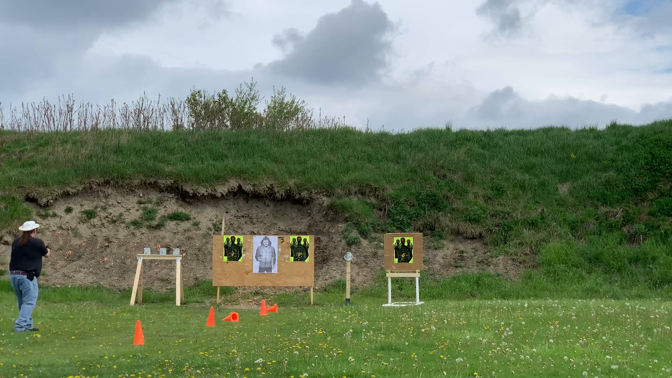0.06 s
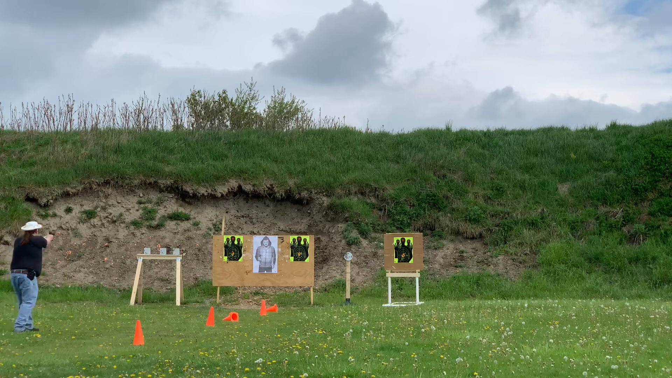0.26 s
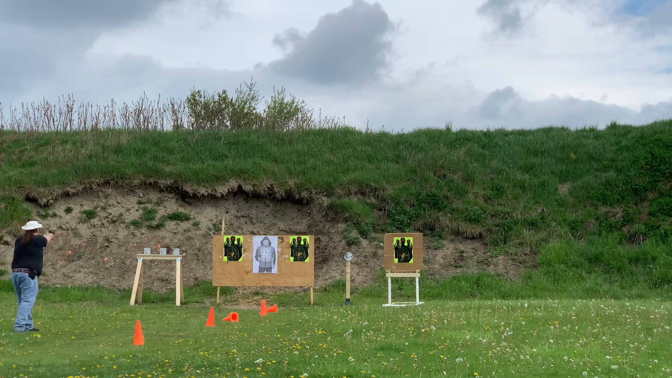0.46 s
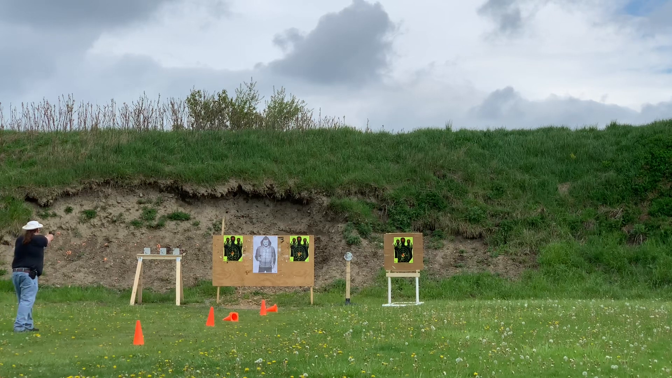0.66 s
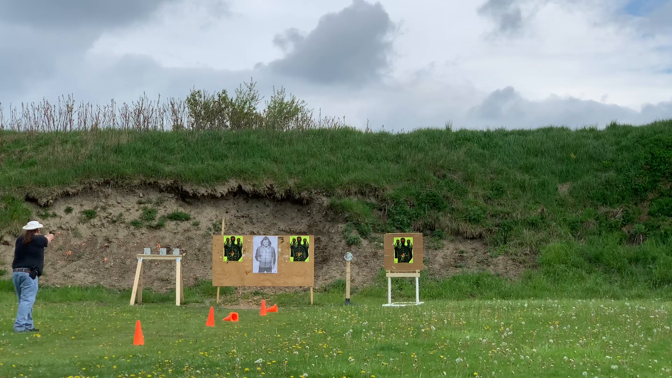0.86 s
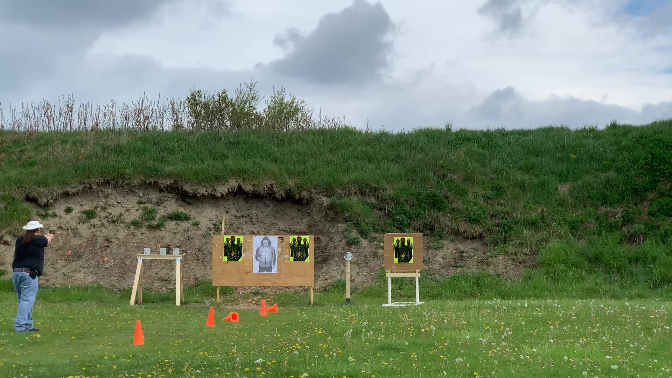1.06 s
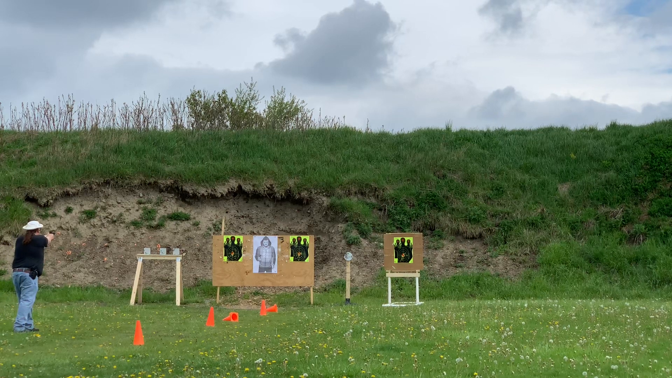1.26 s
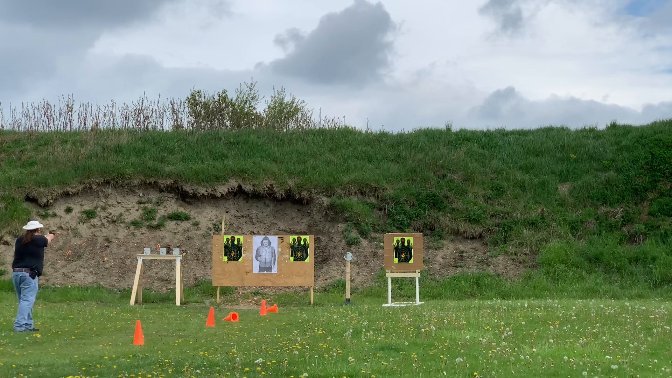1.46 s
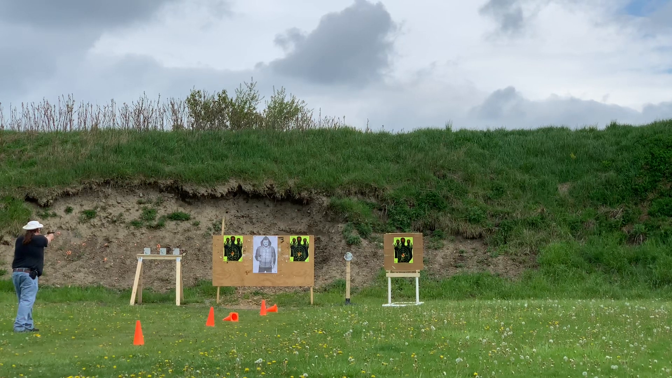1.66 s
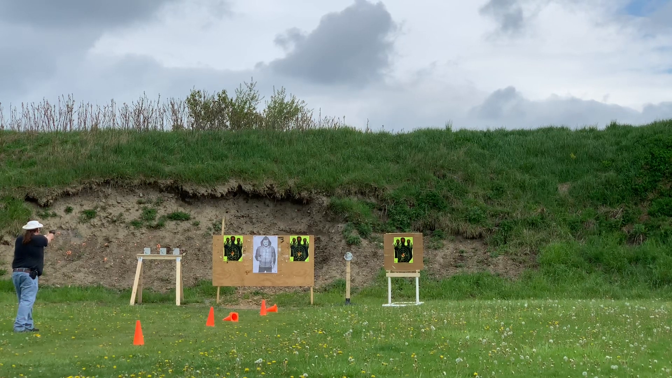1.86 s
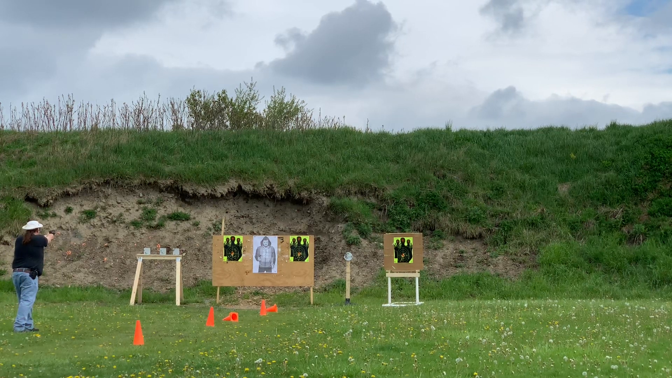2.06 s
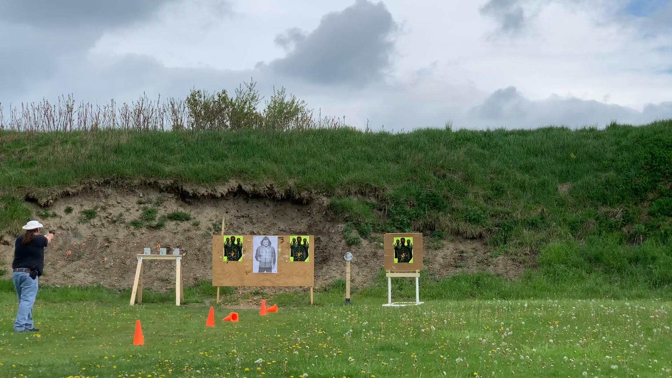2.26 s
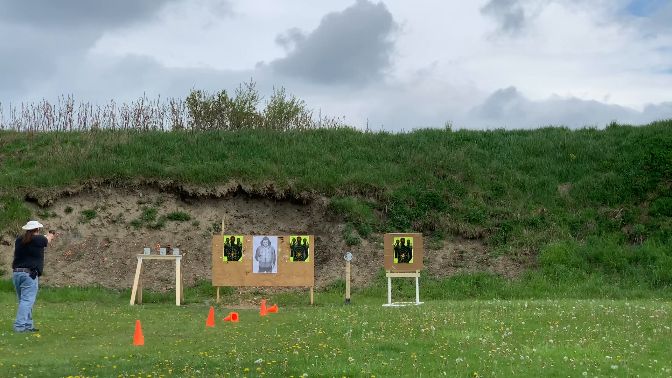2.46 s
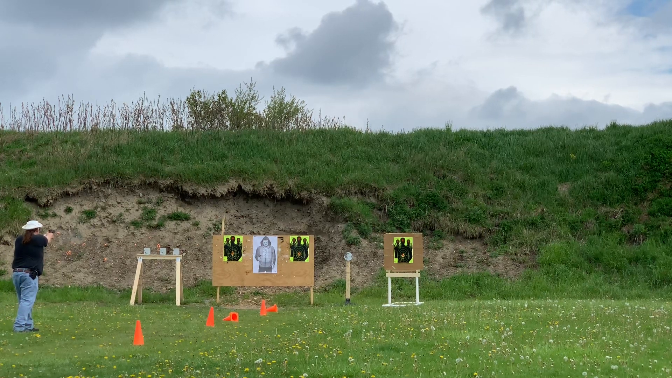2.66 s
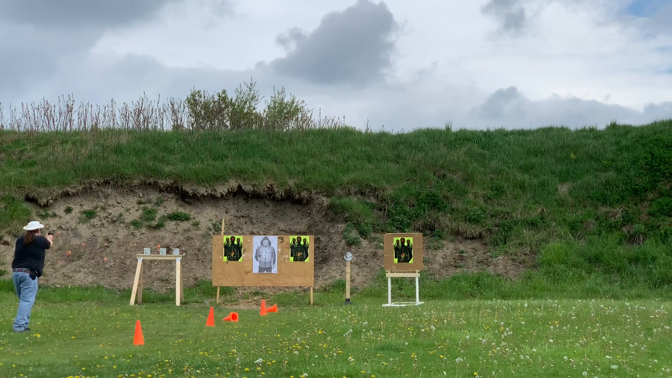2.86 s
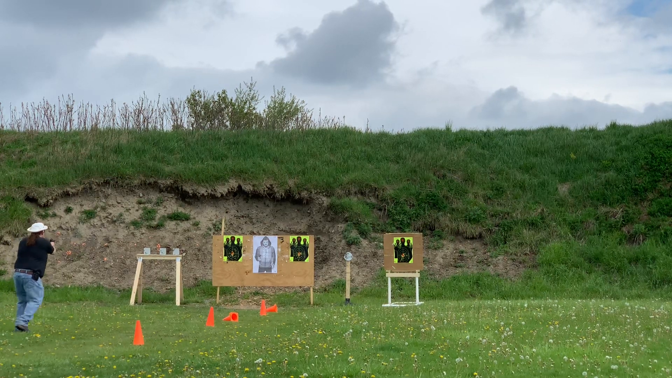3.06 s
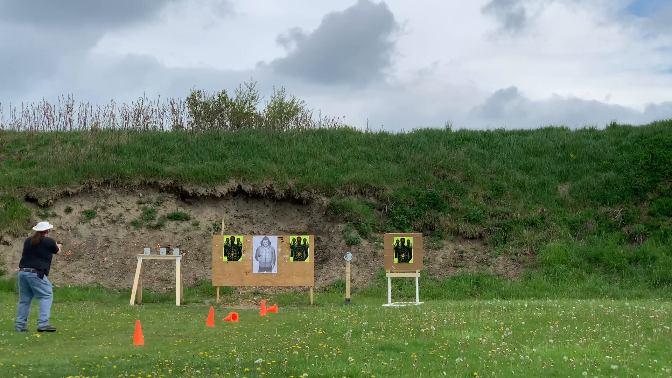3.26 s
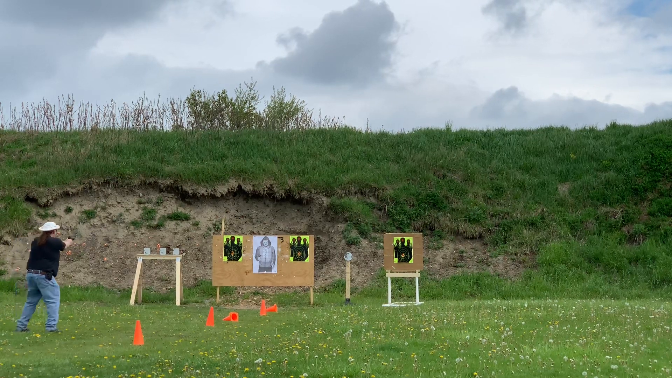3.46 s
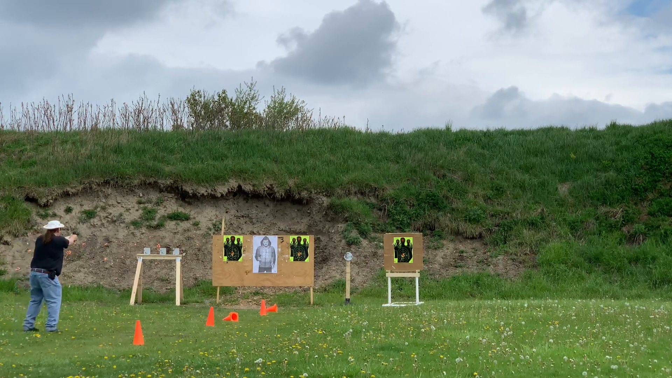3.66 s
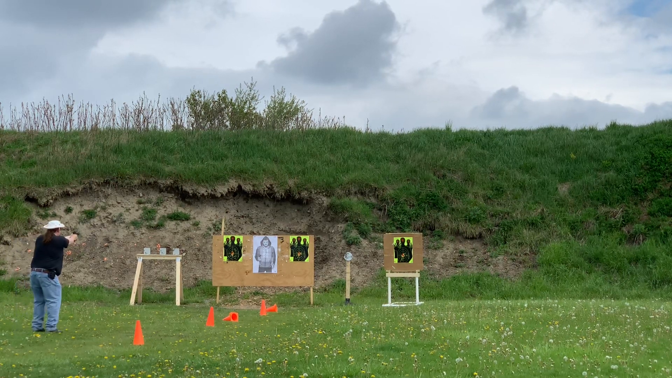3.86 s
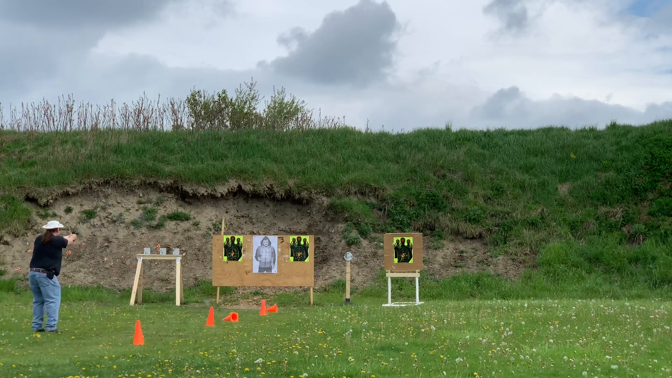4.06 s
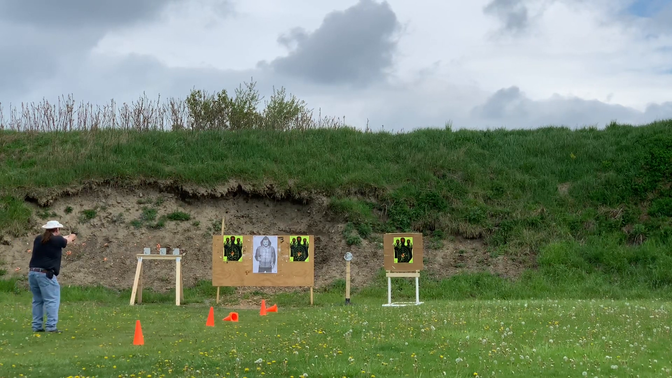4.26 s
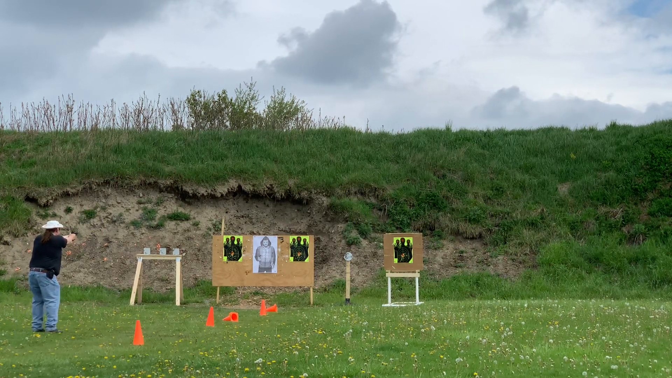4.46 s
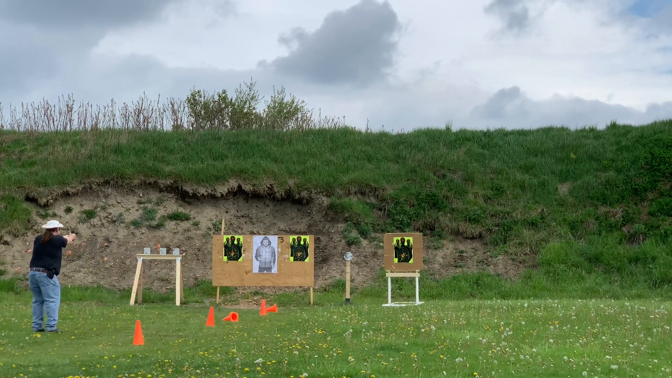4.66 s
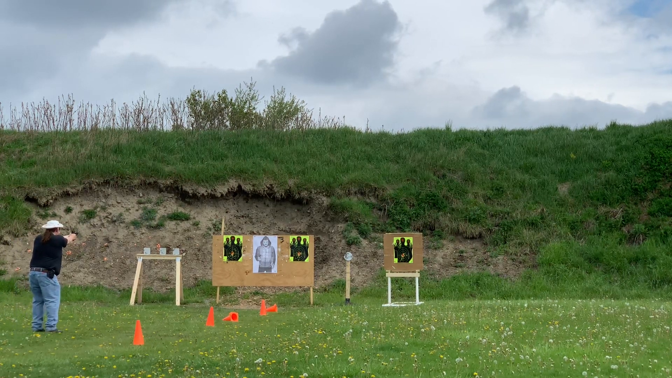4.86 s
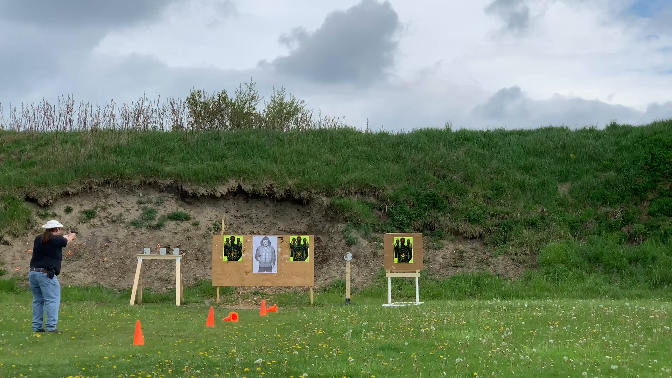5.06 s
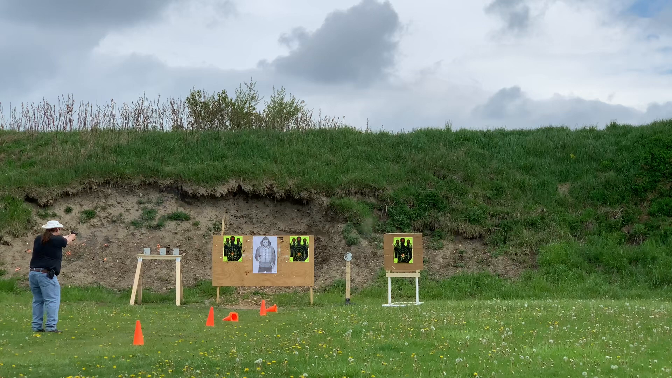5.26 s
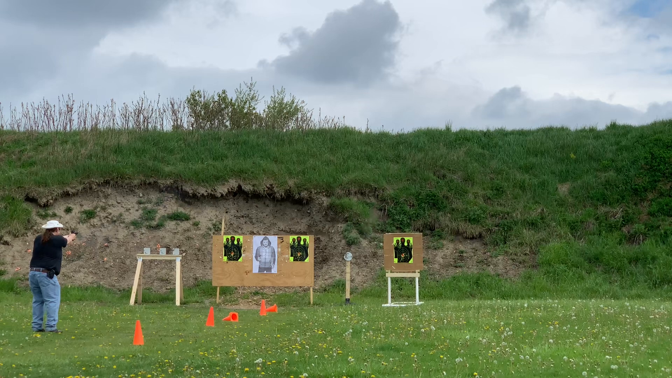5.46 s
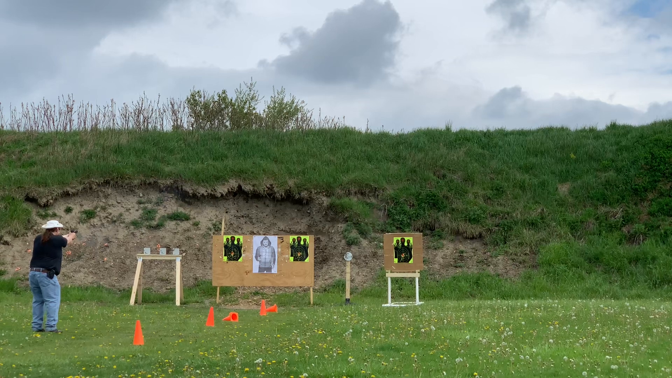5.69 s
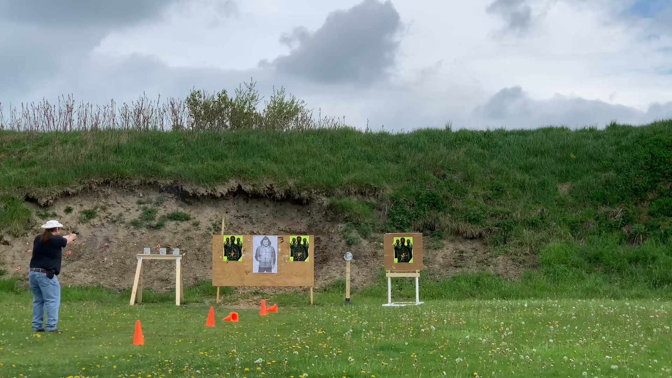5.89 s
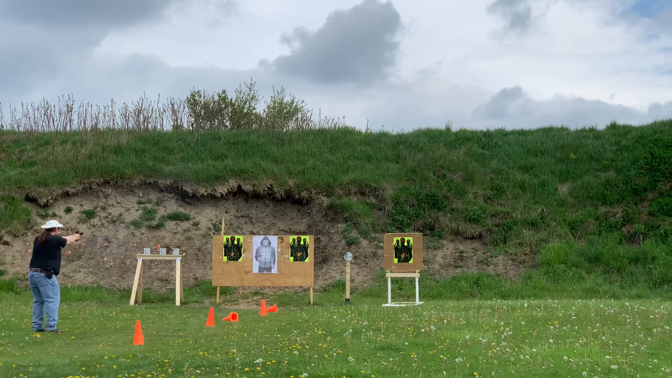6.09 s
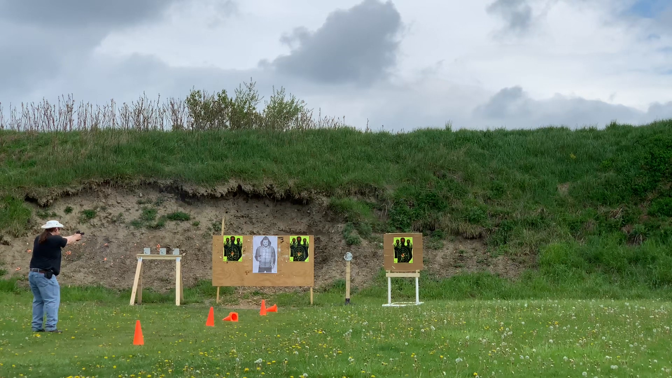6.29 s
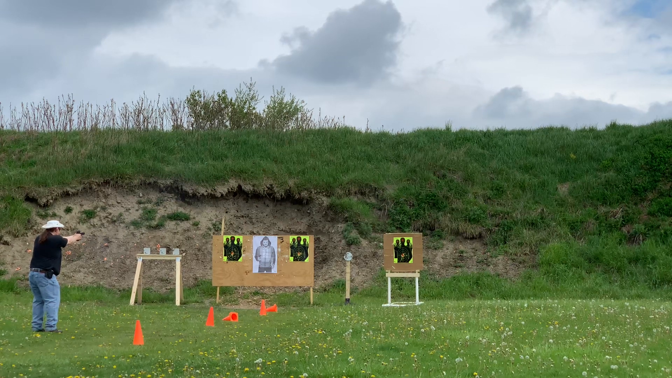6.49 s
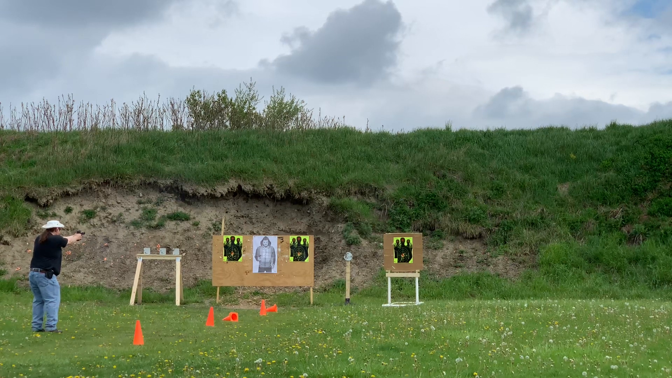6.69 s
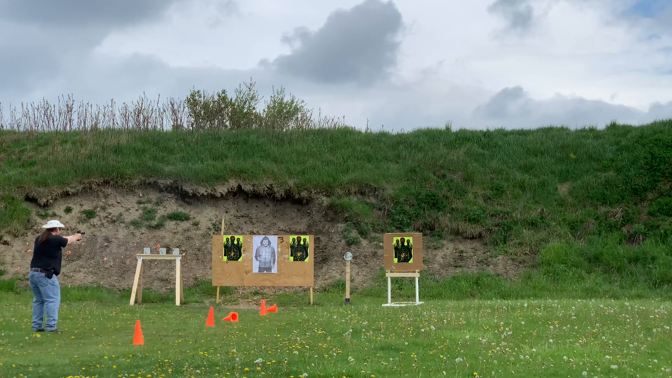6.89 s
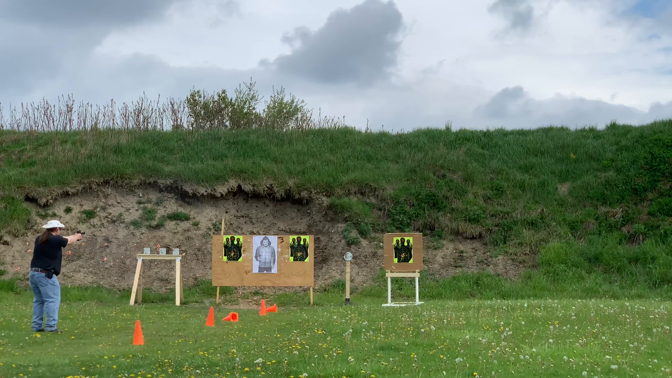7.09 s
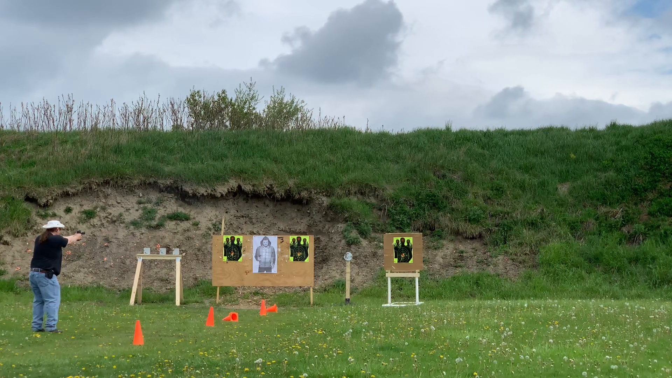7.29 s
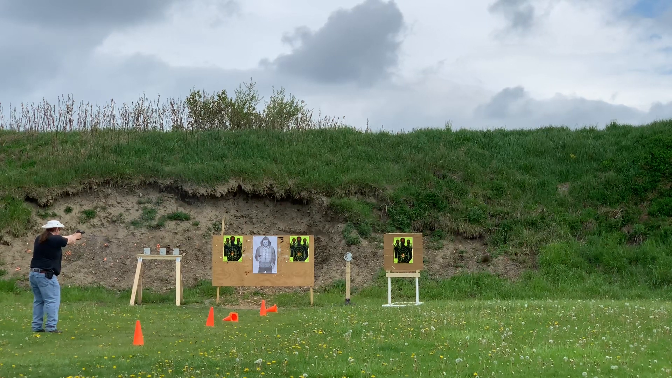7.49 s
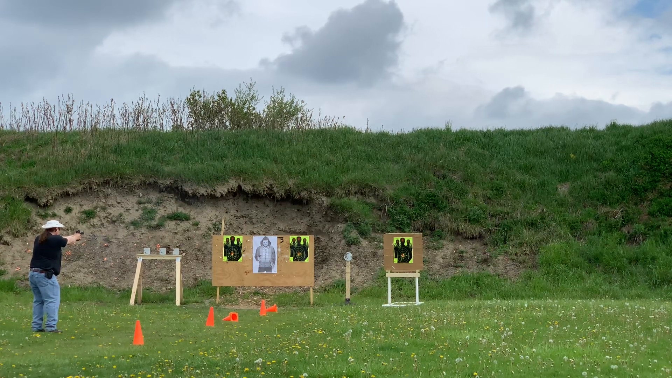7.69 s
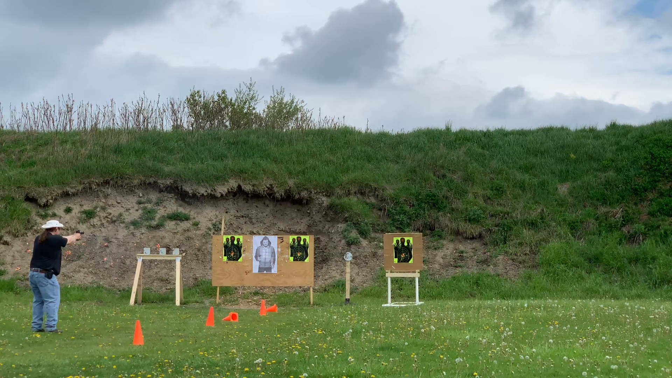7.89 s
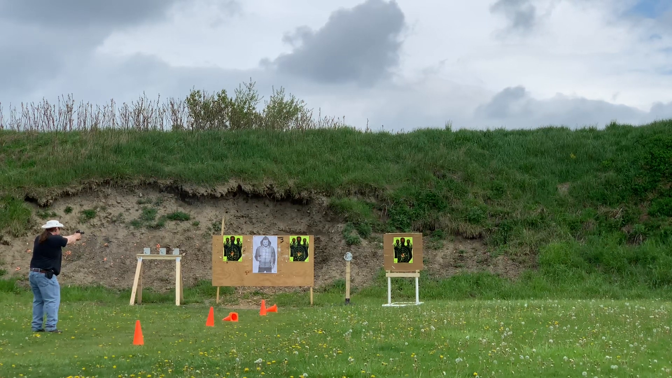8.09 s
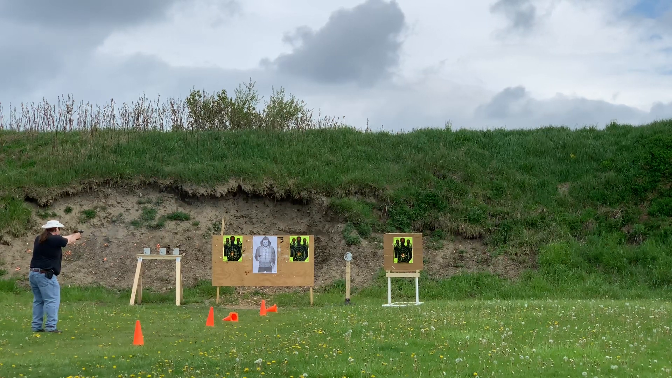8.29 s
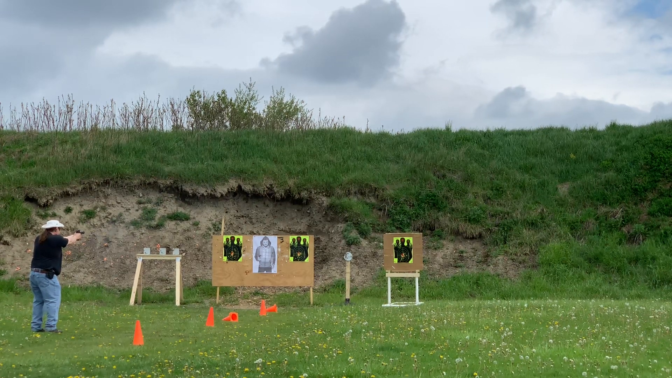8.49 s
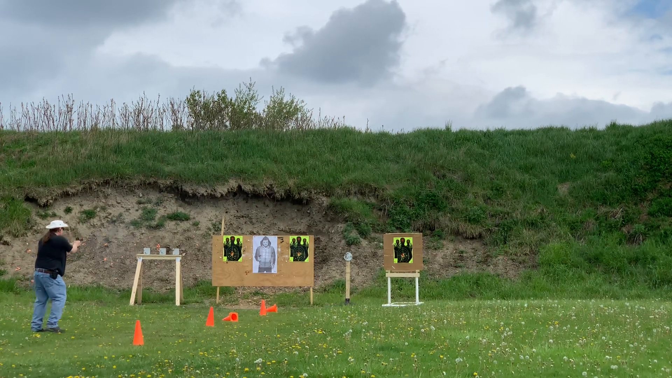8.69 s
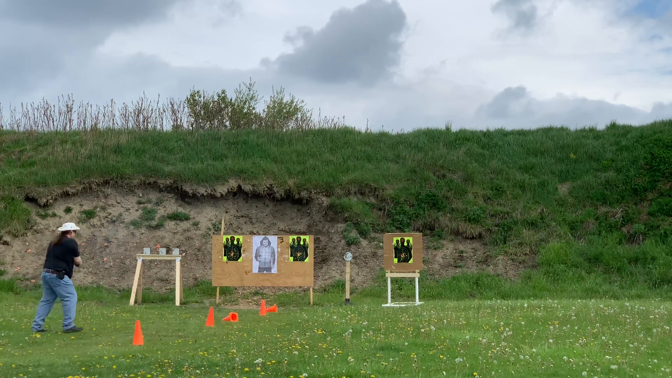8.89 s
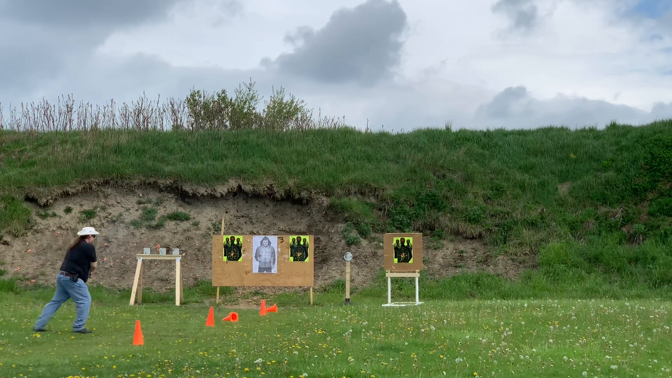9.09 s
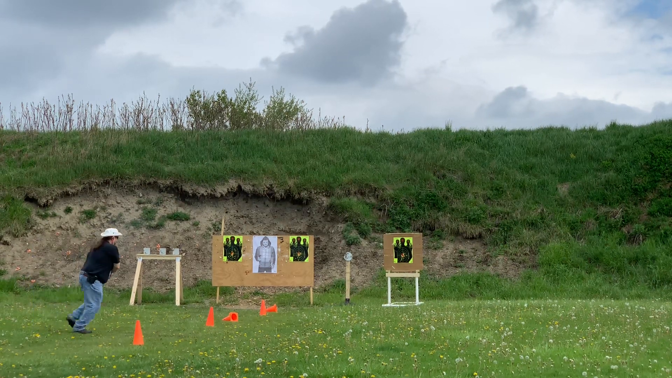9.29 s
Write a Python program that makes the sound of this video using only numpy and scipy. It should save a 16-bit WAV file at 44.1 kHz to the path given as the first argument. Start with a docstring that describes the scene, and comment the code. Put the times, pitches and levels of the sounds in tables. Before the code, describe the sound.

Distant birds chirp and trill in open air with low wind-like rumble, then six handgun shots ring out singly, around a second or more apart, the longest gap in the middle. Every shot snaps hard, booms downward and gets an immediate slap echo, so it sounds like a quick pair, before a soft rolling tail. Muffled far guns thump between them. Wide outdoor stereo pickup, very large contrast between quiet and shots.

```python
"""A handgun fires six times on a grass range: each shot is a noise-burst crack and a dispersed, falling boom.
The earth bank reflects it at once, so it sounds like a quick pair; further banks and trees roll it away
as delayed pulses and decaying noise. Other guns thud far off as low-passed pulses with a soft roll.
Birds sing as gliding sines, trills and chips, over filtered noise: a low rumble, a far drone, open air."""
import sys
import numpy as np
from scipy import signal
from scipy.fft import rfft, irfft, next_fast_len
from scipy.io import wavfile
from scipy.ndimage import uniform_filter1d, map_coordinates

SR = 44100
rng = np.random.default_rng(int(sys.argv[2]) if len(sys.argv) > 2 else 0)


def int16_out(signal):
    """Quantize to a 16-bit WAV file."""
    q = np.round(np.clip(np.atleast_2d(signal).T, -1, 1) * 32767)
    wavfile.write(sys.argv[1], SR, q.astype(np.int16))


N = 411894  # length of the scene [samples]
SIZE = 65536  # length of the echo buffers and of the bushes' reverberation [samples]


def undb(db):
    """Level: decibels to an amplitude ratio."""
    return 10 ** (np.asarray(db) / 20)


def curve(t, rows):
    """Envelope: a (time [s], value) table joined by straight lines."""
    return np.interp(t, *np.transpose(rows))


def colour(points, hz):
    """Spectral envelope: gain of a (frequency [Hz], level [dB]) table, falling steeply past its ends."""
    f, db = np.transpose(points)
    gain = undb(np.interp(np.log(hz), np.log(f), db))
    below = np.minimum(hz / f[0], 1) ** 3
    above = np.minimum(f[-1] / hz, 1) ** 3
    return gain * below * above


def bins(size):
    """Discrete spectrum: the bin frequencies for this many samples, held at 1 Hz or more."""
    return np.maximum(np.arange(size // 2 + 1) * SR / size, 1)


def pan(db):
    """Interaural level difference: left and right gains; a negative value favours the right."""
    return undb(np.array([[db], [-db]]) / 2)


def add(out, s, sound):
    """Superposition: mix a sound in at a time in seconds."""
    i = max(int(s * SR), 0)
    part = sound[..., :max(out.shape[1] - i, 0)]
    out[:, i:i + part.shape[-1]] += part


def walk(rate, size=N):
    """Random modulation: slow drift with a spread near 1, from held random values smoothed twice."""
    k = int(SR / rate)
    steps = np.repeat(rng.standard_normal(size // k + 1), k)
    return 1.2 * uniform_filter1d(uniform_filter1d(steps, k), k)[:size]


def noise(points, size, apart_hz=750):
    """Diffuse-field coherence: stereo noise of rms 1, alike in both ears at long waves, not at short ones."""
    fast = next_fast_len(size, True)
    hz = bins(fast)
    mid, side = rfft(rng.standard_normal((2, fast)))
    side = side * np.minimum(hz / apart_hz + 0.17, 1)
    left_right = np.array([mid + side, mid - side])
    x = irfft(left_right * colour(points, hz), fast)[:, :size]
    return x / np.sqrt(np.mean(x ** 2))


def burst(points, t60, rise_s=0.00018, apart_hz=5000, size=6144):
    """Exponential decay: a spray of tiny arrivals that starts sharply and falls 60 dB in t60 seconds."""
    t = np.arange(size) / SR
    return noise(points, size, apart_hz) * np.minimum(t / rise_s, 1) * undb(-60 * t / t60)


# spectrum of the low rumble (frequency [Hz], level [dB])
RUMBLE_COLOUR = [(12, -43.5), (20, -10.5), (48, -1), (70, 2), (98, -3), (166, -17), (231, -29.5),
                 (265, -31.5), (300, -38.5), (390, -61.5), (660, -120)]
# course of the rumble before its gusts (time [s], level [dB])
RUMBLE_LEVEL = [(0, -51), (2.1, -52.5), (2.5, -61.5), (3.5, -69.5), (4.45, -62.5), (7.1, -67.5),
                (9.33, -66.5)]


def rumble(gust_db=2.5, wind_db=-10):
    """Coherence: a low rumble shared by both ports plus wind nearly independent at each, gusting together."""
    t = np.arange(N) / SR
    wind = noise(RUMBLE_COLOUR, N, apart_hz=20)
    low = noise(RUMBLE_COLOUR, N) + undb(wind_db) * wind
    return low * undb(curve(t, RUMBLE_LEVEL) + gust_db * walk(rate=13))


# spectrum of the open air (frequency [Hz], level [dB])
AIR_COLOUR = [(120, -30), (200, -2.5), (387, -12.5), (883, -7.5), (2510, -21.5), (4350, -28), (7270, -40),
              (9230, -28.5), (11500, -44), (13600, -30), (16000, -52.5)]
# course of the open air before its slight drift (time [s], level [dB])
AIR_LEVEL = [(0, -67), (2.1, -68), (3.0, -75), (3.5, -89), (4.45, -85.5), (5.0, -67), (7.1, -78),
             (9.33, -76)]


def open_air():
    """Broadband ambience: the faint hiss of open air as shaped noise, drifting slightly in level."""
    t = np.arange(N) / SR
    return noise(AIR_COLOUR, N, apart_hz=600) * undb(curve(t, AIR_LEVEL) + 0.33 * walk(rate=3.6))


# spectrum of the far drone (frequency [Hz], level [dB])
DRONE_COLOUR = [(65, -42), (110, -12.5), (248, 2), (383, -7), (613, -25.5), (660, -24), (1000, -27),
                (1300, -53), (2200, -120)]
# course of the drone (time [s], level [dB])
DRONE_LEVEL = [(4.4, -95.5), (5.5, -70), (6.6, -68), (7.2, -71.5), (8.1, -76.5), (9.33, -70.5)]


def drone():
    """Band-limited noise: a dull far drone that swells, sinks and rises again."""
    return noise(DRONE_COLOUR, N) * undb(curve(np.arange(N) / SR, DRONE_LEVEL))


def background():
    """Superposition of the rumble, the open air and the far drone."""
    return rumble() + open_air() + drone()


def whistle(hz, waver=0.0073, overtone_db=-32):
    """Frequency modulation: a nearly pure tone on a pitch track, with weak 2nd and 3rd harmonics."""
    wavering_hz = hz * (1 + waver * walk(rate=1300, size=len(hz)))
    phase = 2 * np.pi * np.cumsum(wavering_hz) / SR
    tone = np.sin(phase) + undb(overtone_db) * (np.sin(2 * phase) + np.sin(3 * phase))
    return np.sqrt(2) * tone * signal.windows.tukey(len(hz), .5)  # soft opening and closing


def glide(length, start, end, arch=0, waver=.012):
    """Glissando: a note that arches from one pitch to another; a strong waver makes it hoarse."""
    u = np.linspace(0, 1, int(length * SR))
    return whistle(start + (end - start) * u + arch * np.sin(np.pi * u), waver)


def bushes(x, wet_db, t60=0.38):
    """Reverberation by convolution: a sound with its soft echo from the bushes."""
    tail = burst([(1500, 0.00024), (15000, 0)], t60, rise_s=.012, apart_hz=750, size=SIZE)
    tail = tail / np.sqrt(np.sum(tail[0] ** 2))  # unit energy on the left
    return x + undb(wet_db) * signal.fftconvolve(x, tail, axes=1)[:, :N]


TWITTER_S, TWITTER_LOW_HZ, TWITTER_TOP_HZ = 3.2, 2190, 4400
TWITTER_DB, TWITTER_FADE_DB_PER_S = -76, 2.5  # level at the start, and how fast it fades


def twitter(count=44, length_s=0.049, slope=.22, spread_db=7):
    """Random point process: far birds' short rising and falling notes from all sides, fading with time."""
    out = np.zeros((2, N))
    for k, (when, pitch, bend, length, place) in enumerate(rng.random((count, 5))):
        s = (k + when) / count * TWITTER_S
        hz = TWITTER_LOW_HZ * (TWITTER_TOP_HZ / TWITTER_LOW_HZ) ** pitch
        tilt = slope * (bend - .5)
        note = glide(length_s * (.5 + length), hz * (1 - tilt), hz * (1 + tilt), waver=0.021)
        level = undb(TWITTER_DB - TWITTER_FADE_DB_PER_S * s)
        add(out, s, level * pan(spread_db * (2 * place - 1)) * note)
    return out


# the clearest whistled notes (time [s], length [s], start pitch [Hz], end pitch [Hz],
# arch at the middle [Hz], level [dB])
NOTES = [(.035, .07, 3780, 3380, 0, -73.5), (.04, .12, 2330, 2350, -29, -71),
         (.125, .065, 4350, 4500, 34, -71), (.18, .018, 4700, 3900, 100, -68),
         (.195, .04, 3900, 4250, -85, -69), (.563, .04, 5060, 4500, 0, -74),
         (1.526, .025, 4200, 3200, 0, -67), (.4, .2, 3560, 3400, -40, -76),
         (.635, .035, 3900, 4750, -220, -65.5), (.783, .09, 2850, 1900, 0, -74),
         (1.278, 0.011, 5030, 4870, 200, -66), (1.4, .06, 3000, 2330, -60, -68.5),
         (1.482, .055, 3350, 4200, -100, -63.5), (1.548, .077, 2080, 2280, -19.5, -67),
         (2.04, 0.074, 2570, 2540, -30, -60.5), (2.261, .064, 2215, 2090, -70.5, -64.5),
         (4.12, .17, 3270, 3230, 0, -94), (4.188, .05, 2420, 2300, -2, -84),
         (6.41, .14, 2700, 2520, 270, -79), (8.88, .025, 3460, 3850, -120, -71)]


def whistled_notes():
    """Pure-tone glissandi: single notes on arched pitch tracks."""
    out = np.zeros((2, N))
    for s, length, start, end, arch, db in NOTES:
        add(out, s, undb(db) * glide(length, start, end, arch, waver=.009))
    return out


CALL_START_S, CALL_EVERY_S, CALL_LENGTH_S = .79, .157, .028
CALL_FROM_HZ, CALL_TO_HZ, CALL_DB = 4500, 3600, -74


def hoarse_call(count=4):
    """Pitch jitter: one bird repeats a falling call, hoarse because its pitch wavers strongly."""
    out = np.zeros((2, N))
    for k in range(count):
        call = glide(CALL_LENGTH_S, CALL_FROM_HZ, CALL_TO_HZ, waver=0.065)
        add(out, CALL_START_S + k * CALL_EVERY_S, undb(CALL_DB) * call)
    return out


# buzzy trills (time [s], length [s], chirp rate [1/s], share of the cycle that sounds,
# from pitch [Hz], to pitch [Hz], mean level [dB])
TRILLS = [(1.29, .39, 64.5, .9, 5200, 4750, -74.5), (2.333, .235, 136, .6, 5100, 3950, -62),
          (2.336, .235, 136, .6, 4250, 3150, -66), (2.335, .235, 136, .5, 3200, 2400, -73)]


def trills():
    """Amplitude roughness: runs of tiny falling chirps, so quick that they buzz."""
    out = np.zeros((2, N))
    for s, length, rate, share, start, end, db in TRILLS:
        for when in np.arange(0, length, 1 / rate):
            chirp = glide(share / rate, start, end, waver=.004)
            add(out, s + when, undb(db + rng.standard_normal()) * chirp)
    return out


CHIP_START_S, CHIP_EVERY_S, CHIP_LENGTH_S, CHIP_DB = 9.008, .138, 0.0662, -62.5


def chips(count=3):
    """Two-voiced tone: a nearer bird chips evenly, each chip growing, with a faint second voice below."""
    out = np.zeros((2, N))
    u = np.linspace(0, 1, int(CHIP_LENGTH_S * SR))
    hz = np.interp(u, [0, .6, .76, 1], [4040, 4260, 4540, 3940])  # a slow rise, a flick up, a drop
    for k in range(count):
        voices = whistle(hz, waver=0.02, overtone_db=-17) + undb(-12) * whistle(hz * .82)
        add(out, CHIP_START_S + k * CHIP_EVERY_S, undb(CHIP_DB) * (.3 + u) * voices)
    return out


def birds():
    """Direct-to-reverberant ratio: song is wet and long in echo, nearer chips and trills drier and shorter."""
    song = twitter() + whistled_notes() + hoarse_call()
    nearer = chips() + trills()
    return bushes(song, wet_db=-3, t60=.55) + bushes(nearer, wet_db=-6, t60=.12)


LEAD_S = .01  # room before the pulse
PULSE_DB, BOOM_HZ = 30, 347  # gain, and the frequency at which the sweep adds no phase
TRAIL_CYCLES, TRAIL_KNEE_HZ = 1, 27.2  # strength of the downward sweep, and where it levels off
# spectrum of the muzzle pulse (frequency [Hz], level [dB])
PULSE_COLOUR = [(20, -22), (60, -2.5), (110, 0), (220, 2), (360, 1.5), (540, -4), (780, -15.5),
                (1250, -11.5), (2400, -26), (5000, -25.5), (10000, -25), (16000, -41)]


def pulse(low_hz, top_hz, stretch=1, size=4096):
    """Dispersion: after soft ground the muzzle pulse's lows trail its highs, so it sweeps down after LEAD_S."""
    hz = bins(size)
    low, top = 1j * hz / low_hz, 1j * hz / top_hz
    high_pass = low ** 2 / (low ** 2 + np.sqrt(2) * low + 1)
    low_pass = 1 / (1 + top) / np.abs(1 + top / 2)
    sweep = np.log((hz + TRAIL_KNEE_HZ) / (BOOM_HZ + TRAIL_KNEE_HZ))
    cycles = stretch * TRAIL_CYCLES * sweep + hz * LEAD_S
    spectrum = colour(PULSE_COLOUR, hz) * high_pass * low_pass * np.exp(-2j * np.pi * cycles)
    return undb(PULSE_DB) * irfft(spectrum) * signal.windows.tukey(size, 1 / 10)


CLUMPS_DB = 3.0  # depth of the clumping


def scatter(points, rise_s, hold_s, sag_db, t60):
    """Diffuse scattering: countless small reflections in clumps swell, sag slowly, then die away."""
    t = np.arange(int((rise_s + hold_s + t60) * SR)) / SR
    sag = np.interp(t, [rise_s, rise_s + hold_s], [0, sag_db])
    release = 60 * np.maximum(t - rise_s - hold_s, 0) / t60
    clumps = CLUMPS_DB * walk(rate=150, size=len(t))
    swell = np.minimum(t / rise_s, 1)
    return noise(points, len(t), apart_hz=1300) * swell * undb(clumps - sag - release)


# far guns (time [s], pulse level [dB], top edge [Hz], roll level [dB])
FAR_SHOTS = [(3.84, -43.5, 70.5, -86), (4.529, -22.5, 190, -58), (5.463, -23.5, 129.4, -61.5),
             (7.153, -25.5, 199, -62.5), (8.903, -25.5, 110.3, -63.5), (9.064, -28, 187, -61)]
# their echoes (delay [s], level relative to the pulse [dB], top edge as a share of the direct sound's)
FAR_ECHOES = [(.012, 13.5, 0.2), (0.027, -2, 0.3), (.045, -3.5, .45)]
# spectrum of their roll (frequency [Hz], level [dB])
FAR_TAIL = [(35, -33), (60, -2), (156, -7), (803, -27), (897, -31), (4230, -30), (8420, -42.5),
            (12000, -69.5), (15600, -96.5), (22000, -120)]


def far_guns(body_db=-31):
    """Diffraction low-pass: over the banks come the boom, a short knock, a few duller echoes and a soft roll."""
    out = np.zeros((2, N))
    knock_colour = [(200, -7), (700, 5), (1300, -14.5), (6000, -31)]  # (frequency [Hz], level [dB])
    for s, db, top_hz, roll_db in FAR_SHOTS:
        add(out, s - LEAD_S, undb(db) * pulse(low_hz=40, top_hz=top_hz))
        knock = burst(knock_colour, t60=0.14, rise_s=0.001, apart_hz=1470)
        add(out, s, undb(db + body_db) * knock)
        for delay, echo_db, share in FAR_ECHOES:
            echo = pulse(low_hz=35, top_hz=top_hz * share)
            add(out, s + delay - LEAD_S, undb(db + echo_db) * echo)
        roll = scatter(FAR_TAIL, rise_s=.003, hold_s=0.18, sag_db=5.5, t60=0.85)
        add(out, s, undb(roll_db) * roll)
    return out


FAR_LAND_S = .22  # scatter that starts this late takes the full change from shot to shot
# scatter spectra of turf, bank, near trees, a wood and the far country (frequency [Hz], level [dB])
TURF = [(24, -30), (40, 2.5), (79, 0.5), (171, -13), (831, -5.5), (2000, -30), (7540, -34.5), (9940, -26.5),
        (11600, -41.5), (14500, -35), (16000, -43)]
BANK = [(35, -42.5), (60, -12), (315, -10.5), (480, -4.5), (749, -8), (1380, -8), (1820, -21.5),
        (2090, -14), (7400, -20.5), (9130, -14.5), (11800, -29), (13600, -27.5), (16000, -34.5)]
TREES = [(24, -33.5), (40, 1), (167, 2), (354, -12), (896, -5), (1950, -14), (4570, -18), (9690, -26.5),
         (11600, -41.5), (13800, -34), (16000, -46.5)]
WOOD = [(24, -41), (40, -22), (149, 5.5), (233, -10.5), (412, -5.5), (933, -31.5), (1140, -13.5),
        (2110, -21.5), (2640, -23.5), (4450, -24), (8910, -30.5), (12900, -48), (15000, -70)]
COUNTRY = [(24, -32.5), (40, 1), (97, 6), (129, -0.5), (319, -9.5), (718, -15), (1000, -17.5),
           (1540, -27.5), (2260, -22), (3470, -26.5), (12000, -60.5), (15600, -86.5), (22000, -120)]
# scatter from each part of the land (spectrum, start [s], rise [s], hold [s], level before the shot's
# own change [dB], sag during the hold [dB], release t60 [s])
LAND = [(TURF, 0.0018, .004, .044, -30.5, 7.7, .095), (BANK, .05, .01, .04, -28, 8.6, .17),
        (TREES, 0.083, 0.043, .125, -45.5, 0.46, .21), (WOOD, .22, 0.007, 0.223, -48, 6.95, 0.33),
        (COUNTRY, 0.2, .02, 0.25, -54.5, 9.5, 1.9)]


def land_scatter(out, s, far_db):
    """Late reverberation: the open land answers a shot, its far parts varying from shot to shot."""
    for points, start, rise, hold, land_db, sag_db, t60 in LAND:
        level = undb(land_db + far_db * min(start / FAR_LAND_S, 1))
        add(out, s + start, level * pan(db=-0.04) * scatter(points, rise, hold, sag_db, t60))


BANK_S = .058  # reference delay of all echoes
# later slope echoes reach lower and sweep longer: values at BANK_S, and powers of delay / BANK_S
SLOPE_LOW_HZ, SLOPE_DEEPENING, SLOPE_STRETCH = 189, .6, .92
# grassy slopes; each row sets its own top edge
# (delay [s], level before the shot's own change [dB], top edge [Hz])
SLOPES = [(0.0593, -3, 750), (0.0987, -10.5, 200), (0.101, -14.5, 484), (.182, -21.5, 168),
          (.236, -25, 188), (.275, -11, 110), (.365, -30, 160), (.49, -33, 100), (.54, -33, 108)]


def slope_echoes(bank_db):
    """Absorption: grassy slopes soak up the highs and return only a long falling boom."""
    out = np.zeros((2, SIZE))
    for delay, db, top_hz in SLOPES:
        far = delay / BANK_S
        boom = pulse(SLOPE_LOW_HZ / far ** SLOPE_DEEPENING, top_hz, far ** SLOPE_STRETCH, size=8192)
        grass = signal.butter(1, 3 * top_hz, fs=SR, output="sos")
        boom = signal.sosfiltfilt(grass, boom)
        add(out, delay - LEAD_S, undb(db + bank_db / far) * pan(db=-2.3) * boom)
    return out


# later face echoes have lower band edges and longer sprays: values at BANK_S, and powers of delay / BANK_S
FACE_LOW_HZ, FACE_TOP_HZ, FACE_DULLING, FACE_DEEPENING = 1030, 9000, 0.96, 0.16
SPRAY_T60_S, SPRAY_STRETCH = .017, 0.57
# spectrum of the spray from a rough face (frequency [Hz], level [dB])
SPRAY_COLOUR = [(530, -25.5), (900, 0.5), (1640, -1), (2300, 6.5), (2960, -1.5), (4410, -5), (5820, -12.5),
                (7310, -20.5), (9420, -11.5), (10500, -11.5), (11700, -30.5), (13500, -20), (16000, -36.5)]
# hard faces, the first three forming the close, quick echo (delay [s], pulse level [dB],
# spray level [dB], both levels before the shot's own change)
FACES = [(0.0582, 0.5, -13), (0.0607, -10.5, -11), (0.0622, -23, -19), (.099, -13.5, -40), (.161, -38, -55),
         (.189, -18.5, -40.5), (.2215, -18, -42), (0.2472, -14.5, -36), (.352, -31.5, -71),
         (.446, -36.5, -54.5)]


def face_echoes(bank_db):
    """Specular and diffuse reflection: hard faces return a thin pulse and a spray from their roughness."""
    out = np.zeros((2, SIZE))
    for delay, db, spray_db in FACES:
        far = delay / BANK_S
        slap = pulse(FACE_LOW_HZ / far ** FACE_DEEPENING, FACE_TOP_HZ / far ** FACE_DULLING)
        add(out, delay - LEAD_S, undb(db + bank_db / far) * pan(db=-1.5) * slap)
        spray = burst(SPRAY_COLOUR, SPRAY_T60_S * far ** SPRAY_STRETCH)
        add(out, delay, undb(spray_db + bank_db / far) * spray)
    return out


EARLY_S, EARLY_DB = 0.0053, -25  # how long before the crack the faint burst starts, and its level
PORT_LAG_S = .00006  # shots come from the left and reach the right port this much later
# spectrum of a faint band-limited noise burst just before the crack (frequency [Hz], level [dB])
EARLY_COLOUR = [(1500, -25), (2800, -8), (3600, -11), (4300, -0.5), (5200, -14.5), (6300, 0), (7500, -25)]
# spectrum of the crack on the front of the muzzle pulse (frequency [Hz], level [dB])
CRACK_COLOUR = [(530, -27.5), (900, -9.5), (1510, -11.5), (2040, -12), (2760, -21), (3470, -9), (4860, -17),
                (5890, -12), (7140, -25.5), (8250, -14.5), (10200, -13.5), (10900, -25.5), (11600, -37),
                (13000, -20), (16000, -33.5)]
# shots (time [s], relative levels of: boom [dB], near echoes [dB], crack [dB], far scatter [dB])
SHOTS = [(1.7006, -0.5, -3.5, 2, 3.5), (2.5781, 0, -2, -5, -1), (4.93, 0, 1.5, -5.5, 0),
         (5.6947, 0.5, 0.5, -4.5, -1), (7.4047, 0, 1, -7.5, 0), (8.3146, 1.5, 1.5, -4.5, -1)]


def handgun():
    """Shock front and muzzle blast: crack and boom of each shot, then its echoes and the land's scatter."""
    out = np.zeros((2, N))
    boom = pulse(low_hz=16, top_hz=2970)
    for s, db, echo_db, crack_db, far_db in SHOTS:
        early_burst = burst(EARLY_COLOUR, t60=.04, rise_s=0.0006)
        add(out, s - EARLY_S, undb(EARLY_DB) * early_burst)
        crack = burst(CRACK_COLOUR, t60=0.02, rise_s=0.00019, apart_hz=19500)
        add(out, s, undb(crack_db - 6.5) * pan(db=-1.0) * crack)
        # the boom follows about a millisecond behind the shock front
        add(out, s + .0012 - LEAD_S, undb(db + 1) * boom)
        sizzle = burst(CRACK_COLOUR, t60=0.054, rise_s=.002, apart_hz=3000)
        add(out, s, undb(crack_db - 20.5) * pan(db=-2.5) * sizzle)
        add(out, s, face_echoes(echo_db) + slope_echoes(echo_db))
        land_scatter(out, s, far_db)
    # the lag is not a whole number of samples, so the right port is interpolated
    right = map_coordinates(out[1], [np.arange(N) - PORT_LAG_S * SR], order=5)
    return np.array([out[0], right])


def scene():
    """Superposition of the whole range."""
    return background() + birds() + far_guns() + handgun()


TOP_HZ = 16300  # upper edge of the pass band


def record(dry, right_cut_hz=30, right_presence_db=-7):
    """Transducer response: less deep bass and more presence on the right, peaks flattened, the top cut."""
    bass_cut = signal.butter(1, right_cut_hz, "highpass", fs=SR, output="sos")
    right = signal.sosfilt(bass_cut, dry[1])
    presence_band = signal.butter(1, [2400, 4800], "bandpass", fs=SR, output="sos")
    presence = signal.sosfilt(presence_band, right)
    ports = np.array([dry[0], right + undb(right_presence_db) * presence])
    rounded = ports / (1 + (ports / .85) ** 8) ** (1 / 8)  # peaks saturate towards .85
    return signal.sosfilt(signal.ellip(8, .2, 70, TOP_HZ, fs=SR, output="sos"), rounded)


dry = scene()
out = record(dry)
int16_out(out)
```